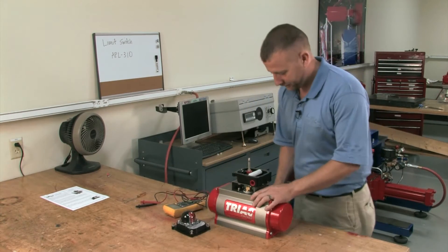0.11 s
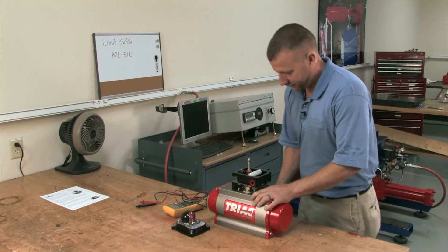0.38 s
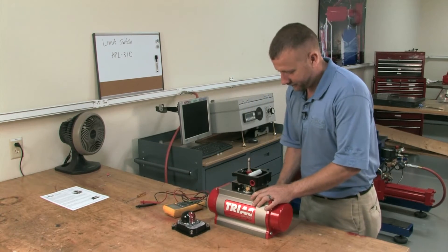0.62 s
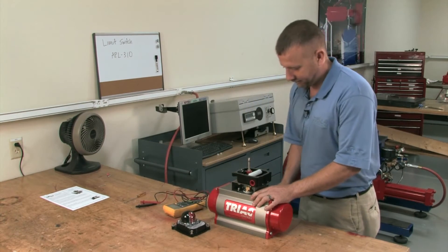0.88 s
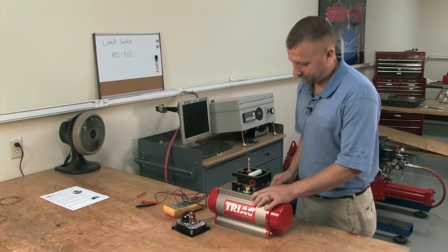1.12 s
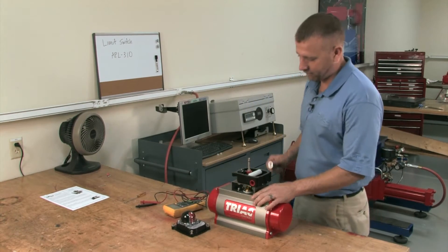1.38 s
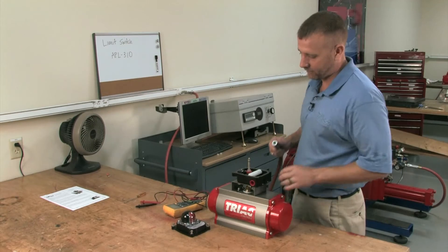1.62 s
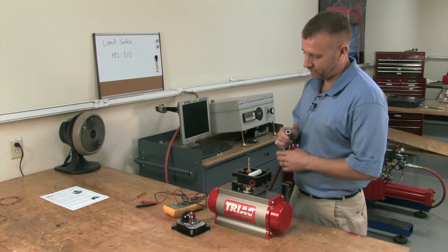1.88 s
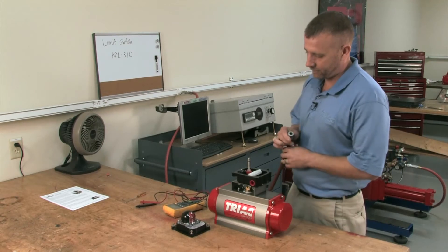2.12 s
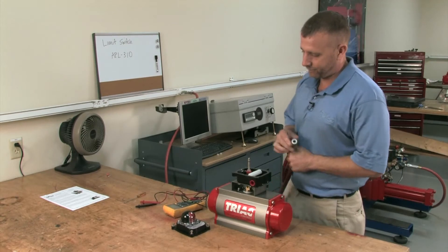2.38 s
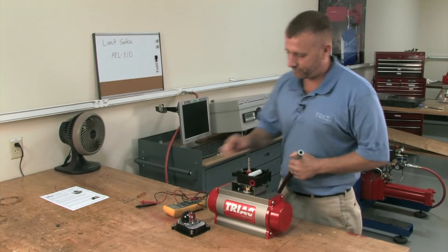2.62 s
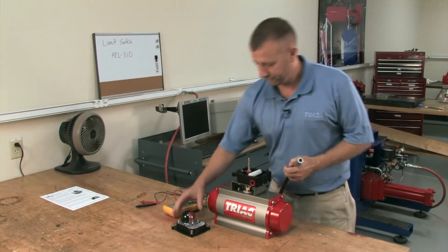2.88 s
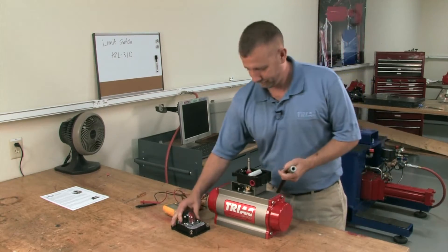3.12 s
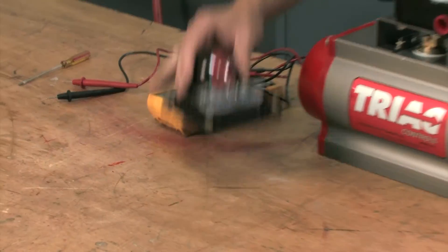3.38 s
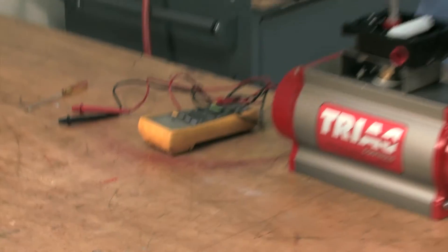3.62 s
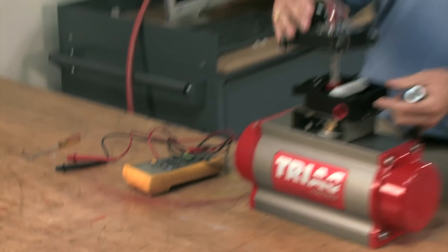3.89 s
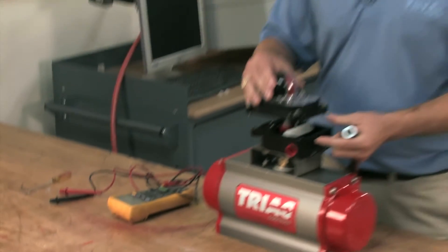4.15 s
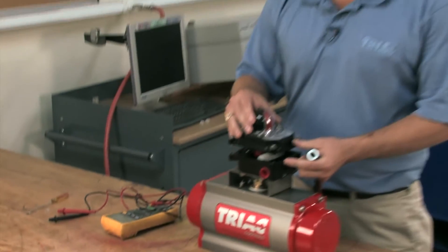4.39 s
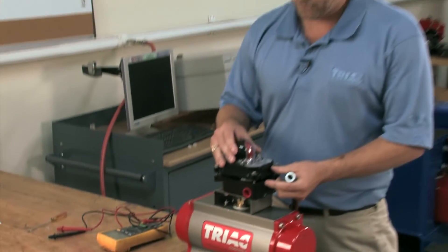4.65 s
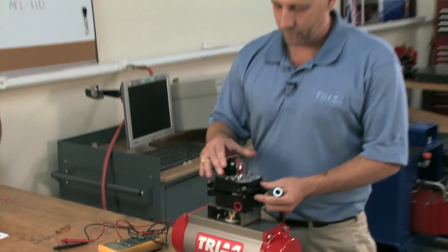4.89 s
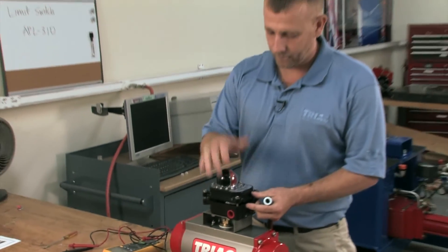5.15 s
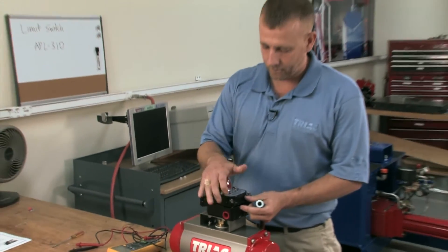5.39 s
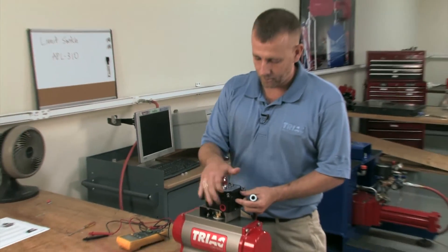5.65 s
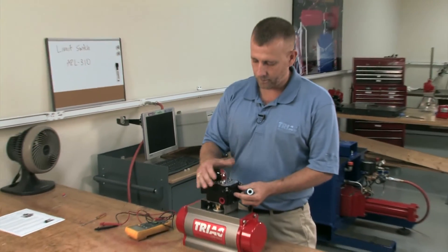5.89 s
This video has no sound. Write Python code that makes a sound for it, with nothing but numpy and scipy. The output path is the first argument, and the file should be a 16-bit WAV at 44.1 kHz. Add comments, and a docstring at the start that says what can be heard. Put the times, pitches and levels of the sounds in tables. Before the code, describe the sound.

Steady thin hiss, a few hard ticks, then a strong burst of compressed air lasting about a second and a half, fading to a thin hiss and a tiny breathy squeak. Near silence with low machine hum follows. Then come close plastic clacks and scrapes, small rattles, one sharp snap and two palm slaps with dull bench thumps, in a modestly reverberant workshop, picked up in mono.

```python
"""In a humming workshop a valve leaks air, clicks, then vents a pneumatic cylinder in a loud jet that thins out
and ends in a faint squeak. A plastic cover is lifted off a bench, slid onto a switch box and slapped home twice.
Air is shaped noise, the squeak a falling tone, and knocks are short noise cracks that ring the cover's modes.
The background sinks during the jet and recovers unevenly. At 3.317 s it falls silent at once, together with
the room echoes and small contacts, then all fade back in."""
import sys
import numpy as np
from scipy import signal
from scipy.fft import rfft, irfft
from scipy.io import wavfile
from scipy.ndimage import map_coordinates

SR = 44100
rng = np.random.default_rng(int(sys.argv[2]) if len(sys.argv) > 2 else 0)


def convert_level_to_amplitude(level_db):
    """Map a level in decibels to its linear amplitude factor."""
    exponent = np.asarray(level_db, float) / 20
    return 10 ** exponent


def digitize_waveform(pressure):
    """Quantize a signal to 16-bit integers and store it at the path in sys.argv[1].

    Rows of a 2-D input are taken as channels; values are limited to [-1, 1].
    """
    field = np.atleast_2d(pressure).T
    bounded = np.clip(field, -1, 1)
    quanta = np.round(bounded * 32767).astype(np.int16)
    wavfile.write(sys.argv[1], SR, quanta)


N = 265305   # length in samples
TIME_S = np.arange(N) / SR


def rms_one(x):
    """Scale a sound so that its rms level is 1."""
    return x / np.sqrt(np.mean(x ** 2) + 1e-20)


def curve(rows):
    """Join (seconds, value) points by straight lines and read them at every sample."""
    seconds, values = np.transpose(rows)
    return np.interp(TIME_S, seconds, values)


def at_hz(points, hz):
    """Read a table of (Hz, value) on a logarithmic frequency axis."""
    table_hz, values = np.transpose(points)
    return np.interp(np.log(hz), np.log(table_hz), values)


def coloured(white, spectrum, peaks=()):
    """Shape white noise by a spectrum in dB and lift it at resonances; the result has rms 1."""
    hz = np.maximum(np.fft.rfftfreq(len(white), 1 / SR), 1)
    db = at_hz(spectrum, hz)
    for centre, width, lift in peaks:
        db = db + lift / (1 + (2 * (hz - centre) / width) ** 2)
    return rms_one(irfft(rfft(white) * convert_level_to_amplitude(db), len(white)))


def drift(rate):
    """Slow random wandering: 'rate' chance values a second with spread 1, joined by straight lines."""
    knots = rng.standard_normal(int(N / SR * rate) + 2)
    return np.interp(TIME_S * rate, np.arange(len(knots)), knots)


def band(x, low_hz, high_hz):
    """Keep only the frequencies between two limits."""
    sos = signal.butter(2, [low_hz, min(high_hz, .45 * SR)], "band", fs=SR, output="sos")
    return signal.sosfilt(sos, x)


def swell(s, rise, hold, fade):
    """An envelope that rises from s seconds, holds and dies away (the other times in ms)."""
    ms = 1000 * (TIME_S - s)
    return np.clip(ms / rise, 0, 1) ** 2 * np.exp(-np.clip(ms - rise - hold, 0, None) / fade)


def ring(force, hz, t60):
    """A resonance: a unit click sets a sine of height 1 ringing, which falls 60 dB in t60 seconds."""
    r, w = convert_level_to_amplitude(-60 / (t60 * SR)), 2 * np.pi * hz / SR
    return signal.lfilter([.5, 0, -.5], [1, -2 * r * np.cos(w), r * r], force + 1e-18)


def jet():
    """Rushing air slides from broad roar to thin hiss as the cylinder empties; turbulence flutters each band."""
    # The valve opens, the flow sags, the cylinder runs empty. Each row: time in seconds, level in dB.
    levels = [(0.81, -34), (0.818, -19.5), (0.84, -14.5), (1.074, -15), (1.13, -17), (1.4, -15.5),
              (2.136, -17), (2.27, -23.5), (2.39, -30.5), (2.534, -60), (2.66, -77)]
    # How far the cylinder has emptied. Each row: time in seconds, stage (0 full, 1 half, 2 spent).
    emptying = [(.8, 0.), (1.09, 0.12), (1.2, 0.63), (1.5, 0.8), (2.15, 1.05), (2.3, 1.75), (2.4, 1.8)]
    # Resonances creep up in the steady flow and sink as pressure dies. Each row: time in seconds, pitch ratio.
    creep = [(1.1, .95), (1.7, 1.), (2.15, 1.04), (2.32, 1.005), (2.6, .985)]
    # Colour of the air at each stage. Each row: frequency in Hz, relative level in dB per Hz.
    full_colour = [(53, -45.5), (90, -16.5), (188, -1.5), (260, -3), (499, 0.5), (647, -3.5), (737, -0.5),
                   (1350, -4.5), (1570, -3.5), (3660, -3.5), (6580, -5), (14400, -12.5), (16000, -18.5)]
    half_colour = [(53, -44.5), (90, -20.5), (219, -3.5), (385, -7.5), (721, -6), (821, -8), (998, -9),
                   (1830, -5.5), (3430, -1.5), (4170, -5.5), (5300, 2.5), (6720, -3.5), (8350, 0),
                   (12300, -6), (16000, -16)]
    spent_colour = [(240, -43), (400, -16), (1230, -20.5), (1870, -3), (3530, -9.5), (5430, -3.5),
                    (6240, -14), (7280, 0.5), (7870, -12), (10500, -13.5), (16000, -18.5)]
    # Resonances of the port. Each row: frequency in Hz, width in Hz, lift in dB.
    port = [(4800, 700, 1.6), (1943, 850, 2), (7000, 220, 5), (8500, 500, 3.3), (10400, 350, 18)]
    stage = curve(emptying)
    white = rng.standard_normal((3, N))
    full = coloured(white[0], full_colour)
    half = coloured(white[1], half_colour)
    spent = coloured(white[2], spent_colour, port)

    # reading the noise faster or slower moves its resonances up or down
    read_at = [np.cumsum(curve(creep))]
    half = map_coordinates(half, read_at, order=5, mode="wrap")
    spent = map_coordinates(spent, read_at, order=5, mode="wrap")
    air = 0
    for k, sound in enumerate([full, half, spent]):
        air = air + np.sqrt(np.clip(1 - abs(stage - k), 0, 1)) * sound

    # surges shared by all bands are strongest while the cylinder is full: 2 dB, later 0.8 dB
    surge_db = (0.8 + 1.2 * np.clip(1 - stage, 0, 1)) * drift(30)
    spectrum = rfft(air)
    band_number = np.round(2 * np.log2(np.fft.rfftfreq(N, 1 / SR) / 400 + 1))
    fluttering = 0
    for k in range(12):
        flutter_db = surge_db + 1.48 * drift(6.36) + 0.62 * drift(30)
        fluttering = fluttering + irfft(spectrum * (band_number == k), N) * convert_level_to_amplitude(flutter_db)
    on = (TIME_S >= levels[0][0]) & (TIME_S <= levels[-1][0])
    return on * convert_level_to_amplitude(curve(levels)) * fluttering


def squeaks():
    """The last air squeaks past a seal: falling, breathy whistles."""
    # Each row: start in seconds, level in dB, length in ms, starting pitch in Hz, fall in Hz per second.
    whistles = [(2.548, -49, 47, 2016, 3380), (2.67, -62, 125, 2040, 1500)]
    rise_share, fade_ms = 0.28, 17.4   # share of the length spent rising; dying away after it
    out = 0
    for s, db, ms, hz, fall in whistles:
        shape = swell(s, rise_share * ms, (1 - rise_share) * ms, fade_ms)
        pitch = hz - fall * np.clip(TIME_S - s, 0, 2 * ms / 1000)
        pitch = pitch + 15 * drift(50)   # unsteady by some 15 Hz
        breath = 1 + 0.22 * rms_one(band(rng.standard_normal(N), 19, 153))
        out = out + shape * breath * convert_level_to_amplitude(db) * np.sin(2 * np.pi * np.cumsum(pitch) / SR)
    return out


def slaps():
    """The palm lands over some milliseconds, the cover rattles down onto its seat and its screws ring."""
    # Palm slaps. Each row: start in seconds, level in dB, rise in ms, hold in ms, fade in ms.
    palms = [(5.334, -19.5, 5.7, 12.6, 22), (5.733, -17.5, 9.1, 23.7, 68.5)]
    # Colour of the rattle, one list for each slap. Each row: frequency in Hz, relative level in dB per Hz.
    colours = [
        [(180, -41.5), (300, -12), (749, 3), (1320, -14.5), (2100, -2), (2520, -6), (4440, -4.5), (6740, -17),
         (7570, -14), (16000, -22)],
        [(180, -45), (300, -9), (502, -16), (814, -3.5), (1690, -14), (3030, -4.5), (3950, -13), (4520, -9),
         (8360, -16.5), (16000, -36)],
    ]
    # One value for each slap, in dB: ring of the cover, room echo and ring of the screws beside the rattle.
    ring_dbs = [-24, -43]
    room_dbs = [-17, -13.5]
    screw_dbs = [-26.5, -63]
    # Captive screws. Each row: frequency in Hz, relative level in dB, time to fall 60 dB in seconds.
    screws = [(4330, -15, 0.16), (4600, -24.5, .18), (7200, -20, 0.11), (7570, -1, 0.093)]
    out = np.zeros(N)
    for (s, db, rise, hold, fade), colour, ring_db, room_db, screw_db in zip(
            palms, colours, ring_dbs, room_dbs, screw_dbs):
        shape = swell(s, rise, hold, fade)
        white = rng.standard_normal(N)
        force = shape * white
        at = round(s * SR)
        rattle = convert_level_to_amplitude(db + 2.0 * drift(59)) * shape * coloured(white, colour)
        rattle += convert_level_to_amplitude(db + ring_db) * cover_ring([at], [force[at:at + SR // 4]], [3500])
        screw_ring = sum(convert_level_to_amplitude(level_db) * ring(force, hz, t60) for hz, level_db, t60 in screws)
        rattle += convert_level_to_amplitude(db + screw_db) * screw_ring
        out += rattle + convert_level_to_amplitude(room_db) * room(rattle)
    return out


def cover_ring(starts, forces, centres):
    """Touches set the cover's modes ringing, most of all those near the touch's own pitch."""
    # Modes of the cover. Each row: frequency in Hz, relative level in dB, time to fall 60 dB in seconds.
    modes = [(740, -6, .05), (1109, -5, .045), (1744, -14, .025), (2175, -5, .03), (2340, -10, .04),
             (3210, -12, .02), (4190, -10, .025), (4480, -3, .018), (4630, 0, .028), (4800, -7, .015),
             (5500, -12, .015), (7250, -14, .025), (8250, -18, .02), (10800, -16, .025), (11700, -20, .02),
             (12800, -20, .02)]
    chance = 2.0 * rng.standard_normal((len(starts), len(modes)))   # dB, new for every touch and mode
    out = 0
    for k, (hz, db, t60) in enumerate(modes):
        train = np.zeros(N + SR)
        for at, force, centre, chance_db in zip(starts, forces, centres, chance[:, k]):
            feed_db = chance_db - 13.0 * abs(np.log2(hz / centre))   # 13 dB less for each octave away
            train[at:at + len(force)] += convert_level_to_amplitude(feed_db) * force
        out = out + convert_level_to_amplitude(db) * ring(train[:N], hz, t60)
    return out


def contacts():
    """Hard touches: each is a short noise crack with a bright edge that also sets the cover ringing."""
    # The cover knocks against bench and box. Each row: start in seconds, peak in dB, centre in Hz,
    # bright edge in dB beside the peak, force on the cover in dB beside the peak.
    knocks = [(3.297, -54, 3670, -16, 11.5), (3.314, -49, 4450, -17, 8), (3.368, -32, 4520, -24, -6),
              (3.382, -38, 4600, -19, 7), (3.399, -33.5, 3600, 5, 21), (3.405, -34.5, 3570, 17, -11),
              (3.408, -31, 2200, -15, 10), (3.435, -34, 4600, 2, -9), (3.449, -28.5, 4630, 13.5, -8),
              (3.46, -24, 4660, -1, -11), (4.38, -23.5, 1220, -39, -7), (4.388, -44, 5400, -21, -7),
              (4.418, -25, 3000, -30, -5), (4.42, -25, 5500, -32, -21), (4.467, -18, 2180, -45, -14),
              (4.469, -26, 4600, -27, -13.5), (4.484, -43, 4640, -22, 2), (4.557, -33.5, 1800, -30, -12),
              (4.573, -33, 1200, -33, -19), (4.583, -33, 3400, -26, -12), (4.599, -38, 2500, -22, -12),
              (4.613, -41, 4420, -8, 5.5), (4.643, -38, 4300, -8, -6), (4.679, -35, 3500, -9, -4),
              (4.687, -36, 1800, -11, -14), (4.702, -33, 5500, -13, -19), (4.726, -30, 4600, -12, -4),
              (4.732, -15, 5040, 0, -15), (4.74, -24.5, 4440, -11, 0)]
    # Valve lever, hose fitting and fingers tick. Each row: start in seconds, peak in dB, centre in Hz.
    ticks = [(.761, -17, 4030), (0.796, -18, 2500), (.802, -11.5, 3500), (2.814, -52.5, 2490),
             (2.883, -48, 1270), (2.912, -49.5, 3740), (3.177, -53, 4280), (3.19, -54, 4320),
             (3.249, -51, 4400), (3.816, -51, 3800), (4.077, -53, 9030), (4.33, -53, 2980),
             (4.949, -43.5, 3510), (4.985, -47.5, 8500), (5.066, -49, 3550)]
    # Loose screws chink in their holes. Each row: start in seconds, peak in dB.
    chinks = [(4.766, -41), (4.773, -43), (5.349, -21), (5.355, -15.5), (5.403, -21), (5.417, -27),
              (5.444, -27), (5.451, -34), (5.465, -33), (5.481, -42), (5.918, -47)]
    rows = list(knocks)
    rows += [(s, db, hz, -13, -13.5) for s, db, hz in ticks]
    rows += [(s, db, 10350, -5, 3) for s, db in list(chinks) + jiggle(count=8)]
    cracks, starts, forces = np.zeros(N + SR), [], []
    t = np.arange(1500) / SR
    for s, db, hz, edge_db, ring_db in rows:
        decay_ms = 1.7 * (hz / 3000) ** 0.36   # brighter cracks last longer
        burst = rng.standard_normal(len(t)) * np.exp(-t * 1000 / decay_ms)
        burst[0] = 3.0   # the first touch stands out of the noise
        body = band(band(burst, hz / 1.8, hz * 4.1), hz / 2.0, hz * 1.1)
        edge = band(band(burst, 7000, 13000), 7000, 13000)
        crack = body / abs(body).max() + convert_level_to_amplitude(edge_db) * edge / abs(edge).max()
        at = round(s * SR)
        cracks[at:at + len(t)] += convert_level_to_amplitude(db) * crack
        starts.append(at)
        forces.append(convert_level_to_amplitude(db + ring_db) * burst / np.sqrt(np.sum(burst ** 2)))
    return cracks[:N] + cover_ring(starts, forces, np.array(rows)[:, 2])


def jiggle(count):
    """Loose screws also chink at random while the cover slides; gives (start in seconds, peak in dB)."""
    from_s, to_s, lowest_db, spread_db = 4.6, 4.76, -51, 3
    when, size = rng.random((count, 2)).T
    return list(zip(from_s + (to_s - from_s) * when, lowest_db - spread_db * np.log(size)))


def scrapes():
    """The cover drags over an edge: dense uneven grit clicks, heard directly and through the cover."""
    # Each row: start in seconds, level in dB, length in ms, fade in ms, centre in Hz.
    drags = [(3.35, -56, 75, 8.8, 4500), (3.357, -41, 26, 9.7, 2190), (3.398, -24, 10, 6.3, 4270),
             (3.396, -32.5, 14, 39, 1060), (3.4, -29, 12, 20, 2300), (3.431, -28, 12, 45, 4600),
             (4.585, -42.5, 40, 89, 2370), (4.597, -35.5, 18, 33, 705), (4.687, -36.5, 73, 12, 690),
             (4.7, -40, 28, 9.8, 4400), (5.4, -43, 68, 30, 4440)]
    rise_share = 0.11   # share of the length spent rising
    sizes = convert_level_to_amplitude(1.34 * np.minimum(rng.exponential(1, N), 4)) * rng.choice([-1, 1], N)
    grit = rms_one(sizes * (rng.random(N) < 4000 / SR))   # about 4000 clicks a second
    direct, starts, forces = 0, [], []
    for s, db, ms, fade, hz in drags:
        shape = swell(s, rise_share * ms, (1 - rise_share) * ms, fade)
        force = convert_level_to_amplitude(db + 1.3 * drift(59)) * shape * grit
        direct = direct + band(force, hz / 1.31, hz * 1.69)
        at = round(s * SR)
        starts.append(at)
        forces.append(force[at:at + SR // 3])
    return direct + convert_level_to_amplitude(-22) * cover_ring(starts, forces, np.transpose(drags)[-1])


def bench():
    """Loose things keep shaking the damped bench top, so its low modes rumble unevenly."""
    # Modes of the top. Each row: frequency in Hz, relative level in dB, time to fall 60 dB in seconds.
    modes = [(70, -35, .1), (109, 1.5, 0.2), (164, 7, 0.084), (217.4, 5.5, 0.15), (272, 4, 0.046),
             (374, -7, 0.043)]
    # It shudders a moment after it is disturbed.
    # Each row: start in seconds, level in dB, rise in ms, hold in ms, fade in ms.
    shudders = [(3.44, -41, 32, 76, 86), (4.42, -50, 51, 320, 100), (5.345, -30.5, 17, 71, 79),
                (5.746, -25.5, 35, 35, 110)]
    white = rng.standard_normal(N)
    rumble = rms_one(sum(convert_level_to_amplitude(db) * ring(white, hz, t60) for hz, db, t60 in modes))
    return rumble * sum(convert_level_to_amplitude(db) * swell(s, rise, hold, fade) for s, db, rise, hold, fade in shudders)


def leak():
    """Air hisses through the valve's pipework, almost steadily, until the valve shifts."""
    # Colour of the hiss. Each row: frequency in Hz, relative level in dB per Hz.
    colour = [(180, -33.5), (300, -10), (1030, -6.5), (1840, 0.5), (2740, -7.5), (6520, -12.5), (7950, -13),
              (14000, -9), (16000, -16.5)]
    # Pipe resonances. Each row: frequency in Hz, width in Hz, lift in dB.
    pipe = [(1800, 1000, 5.5), (3980, 980, 10), (5200, 250, 2.5), (6530, 1600, 9.5), (8550, 560, 4),
            (10900, 590, 8), (12300, 500, 2.5), (14270, 1500, 8)]
    on = TIME_S < 0.806
    level_db = -30 + 0.9 * drift(3.78) + 0.5 * drift(33)
    return on * convert_level_to_amplitude(level_db) * coloured(rng.standard_normal(N), colour, pipe)


def room(x):
    """Diffuse echoes: noise that builds up, then dies away band by band; total energy 1."""
    # Time the echoes take to fall 60 dB. Each row: frequency in Hz, time in seconds.
    t60s = [(100, 0.76), (400, 0.55), (1500, 0.46), (5000, 0.41), (15000, 0.35)]
    t = np.arange(SR) / SR
    white = rng.standard_normal(SR)
    echoes = 0
    for low in 60 * 2. ** np.arange(9):   # octave bands, lower edge in Hz
        t60 = at_hz(t60s, np.sqrt(2) * low)
        echoes = echoes + band(white, low, 2 * low) * convert_level_to_amplitude(-60 * t / t60)
    echoes = band(echoes, 70, 7100)   # walls soak up the treble
    echoes = echoes * np.clip((t - .004) / 0.02, 0, 1)
    return signal.fftconvolve(x, echoes / np.sqrt(np.sum(echoes ** 2)))[:N]


def hum():
    """Background of distant machines and ventilation: low noise with drones, down to faint hiss."""
    # Level heard: it sinks during the jet and recovers unevenly. Each row: time in seconds, level in dB.
    levels = [(0.0, -39.5), (0.8, -38), (1.6, -41.5), (2.1, -46.5), (2.61, -54), (3.3, -46), (3.8, -48.5),
              (4.3, -45.5), (4.75, -43), (5.15, -48), (5.45, -45.5), (5.83, -44.5), (6.02, -41)]
    # Colour of the background. Each row: frequency in Hz, relative level in dB per Hz.
    colour = [(12, -70), (20, -39), (49, -16.5), (86, -16), (123, -3), (210, -10.5), (255, -7.5),
              (301, -17.5), (337, -12.5), (367, -14.5), (678, -24.5), (802, -26), (2320, -44), (8180, -51),
              (16000, -51.5)]
    # Machine drones. Each row: frequency in Hz, width in Hz, lift in dB.
    drones = [(113, 12, 4), (172, 37, 2.5), (331, 14, 10.5)]
    level_db = curve(levels) + 0.91 * drift(1.9)
    return convert_level_to_amplitude(level_db) * coloured(rng.standard_normal(N), colour, drones)


def hiss():
    """Steady faint noise of the microphone."""
    return convert_level_to_amplitude(-75) * rms_one(band(rng.standard_normal(N), 1500, 12000))


def scene():
    """All sources at one microphone, the same in both channels."""
    air = leak() + jet() + squeaks()
    touches = contacts() + scrapes()
    echoes = convert_level_to_amplitude(-18.5) * room(air) + convert_level_to_amplitude(-23) * room(touches)
    # these sounds stop at once, then fade back in
    silent_s, fade_in_s = 3.317, 0.075
    fade = np.where(TIME_S < silent_s, 1, np.clip((TIME_S - silent_s) / fade_in_s, 0, 1))
    fading = fade * (touches + echoes + hum() + hiss())
    return np.tile(air + slaps() + bench() + fading, (2, 1))


def low_pass(x):
    """Removes everything above the highest recorded frequency."""
    return signal.sosfilt(signal.butter(12, 17050, fs=SR, output="sos"), x)


def record(dry):
    """A steep filter cuts the top above about 16 kHz."""
    top_cut = signal.cheby2(24, 50, 16100, fs=SR, output="sos")
    mix = signal.sosfilt(top_cut, dry)
    return low_pass(mix)


dry = scene()
out = record(dry)
digitize_waveform(out)
```